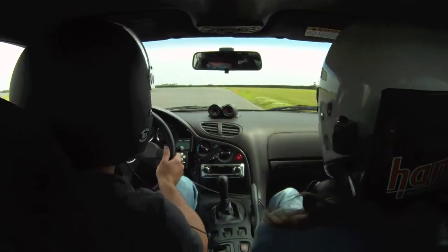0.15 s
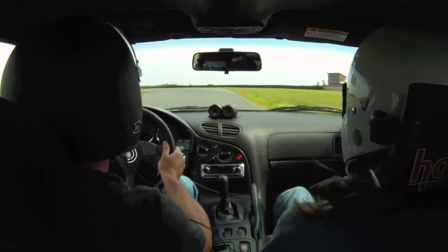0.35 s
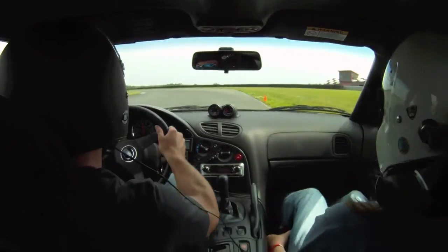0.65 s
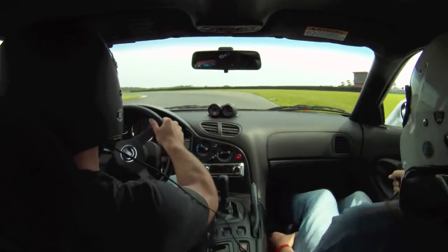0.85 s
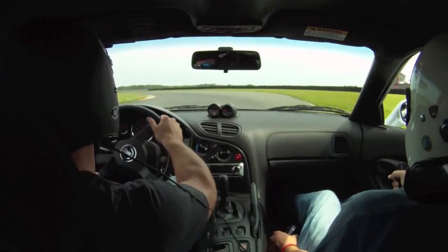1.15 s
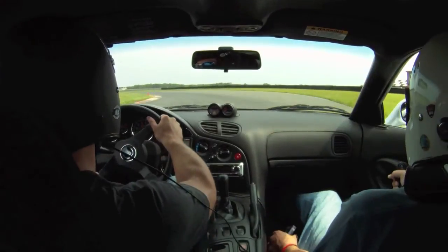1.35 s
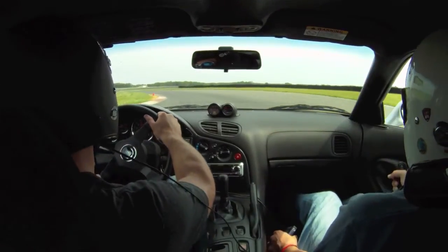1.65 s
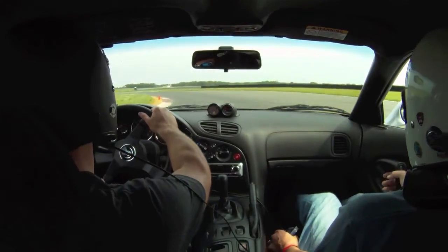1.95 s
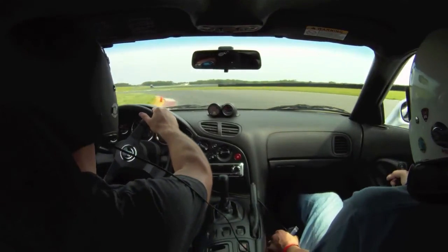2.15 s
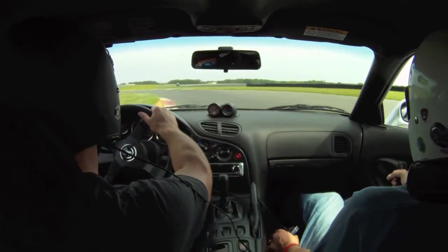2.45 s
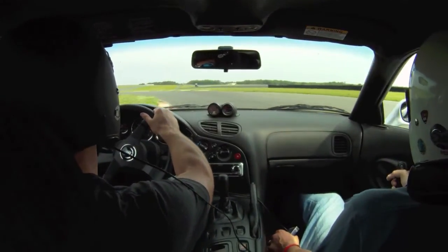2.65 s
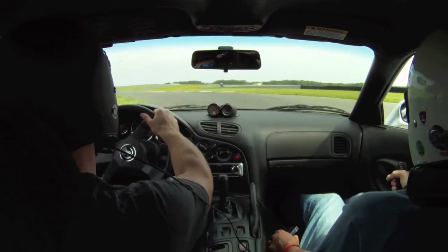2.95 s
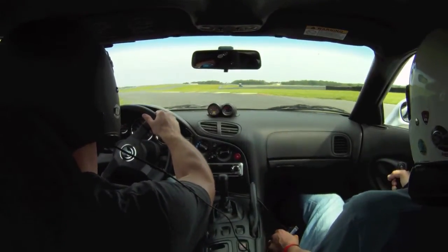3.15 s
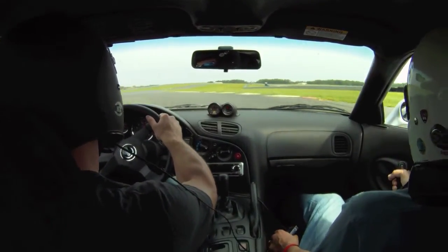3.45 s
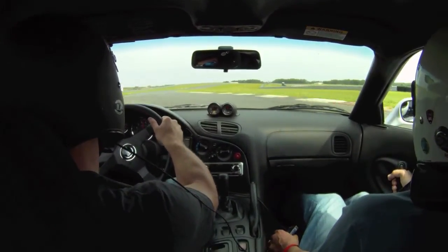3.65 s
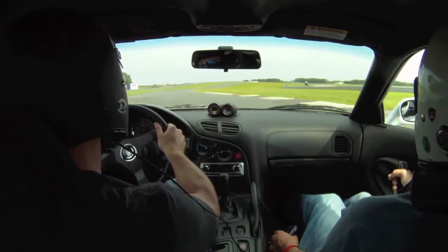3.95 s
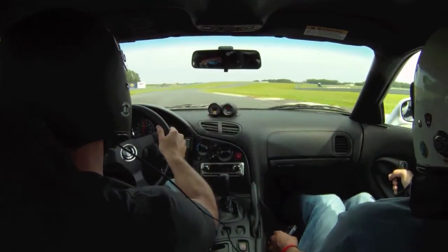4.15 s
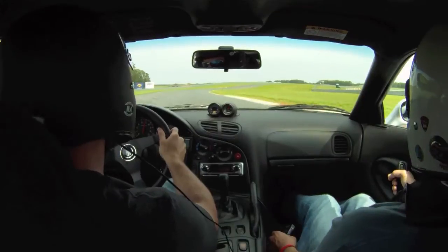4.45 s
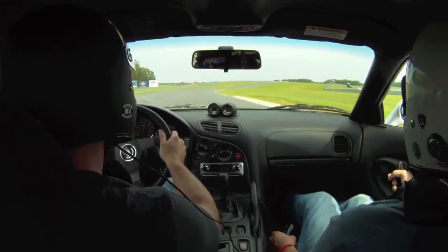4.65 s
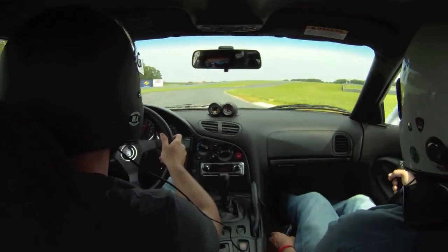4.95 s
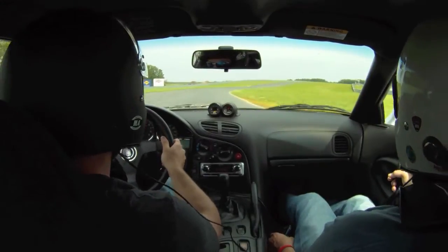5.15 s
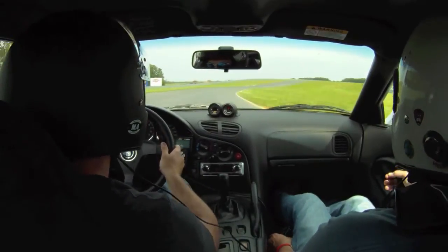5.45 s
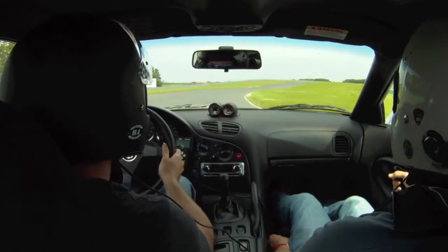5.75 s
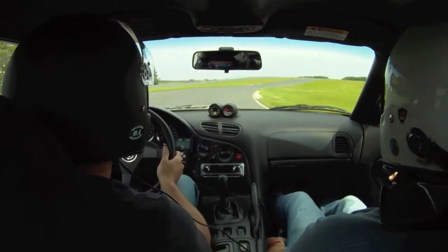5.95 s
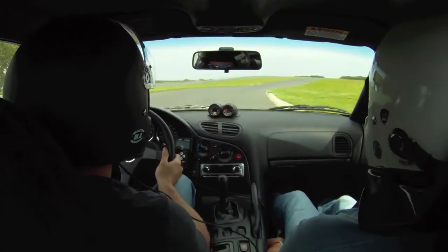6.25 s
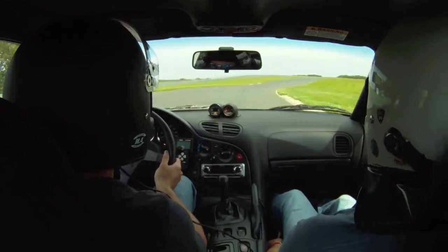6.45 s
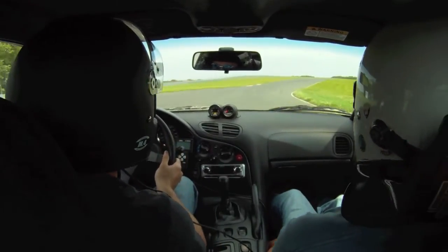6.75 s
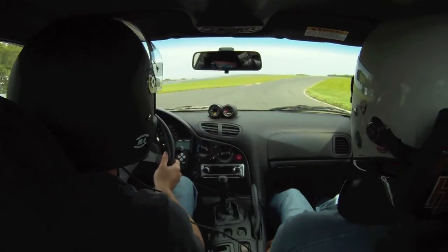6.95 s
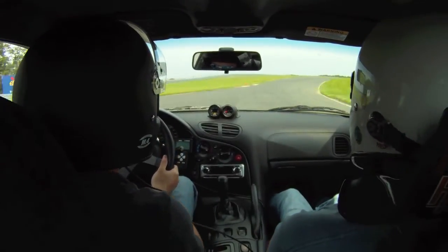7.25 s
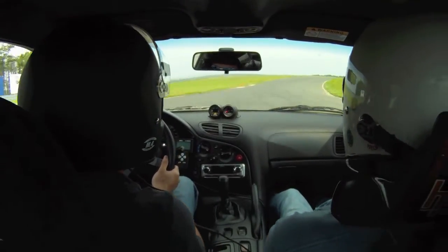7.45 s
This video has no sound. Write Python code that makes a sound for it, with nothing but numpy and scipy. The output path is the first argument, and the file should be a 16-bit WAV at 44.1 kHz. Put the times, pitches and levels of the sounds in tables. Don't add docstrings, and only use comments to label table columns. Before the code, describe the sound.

Inside a sports car at speed, captured by a small, gritty camera microphone with limited treble. From 0 to 1.1 s the engine coasts, a muffled hum sinking slightly over deep body boom, tyre roar and wind, with a cluster of suspension thumps around 0.15-0.6 s. At about 1.15 s the throttle opens with a small driveline jerk, and a full, buzzing growl climbs smoothly until 5.9 s, its overtones swelling through cabin resonances. Loose trim rattles in dry ticks from 2.2 to 3.8 s; a bump lands near 3.0 s. A faint high turbo whistle is clearest around 4-4.6 s. At 5.95 s the throttle shuts: load vanishes and a fluttering, chirping hiss vents for under half a second. Heavy thumps and exhaust pops hit at 6.2, 6.4, 6.55, 6.85 and 7.0 s, briefly ducking the level. The rough hum then sinks over rumbling road noise until 7.6 s.

```python
import sys
import numpy as np
from scipy import signal
from scipy.fft import rfft, irfft, next_fast_len
from scipy.io import wavfile
from scipy.ndimage import uniform_filter1d

SR = 44100
rng = np.random.default_rng(int(sys.argv[2]) if len(sys.argv) > 2 else 0)


def master(y):
    cut = np.clip(np.atleast_2d(y).T, -1, 1)
    pcm = np.round(cut * 32767)
    wavfile.write(sys.argv[1], SR, pcm.astype(np.int16))


def to_linear_factor(level_db):
    exponent = np.asarray(level_db, float) / 20
    return 10 ** exponent


N = 335601


def curve(table, step=1):
    s, *columns = np.transpose(table)
    return [np.interp(np.arange(0, N, step) / SR, s, c) for c in columns]


def unit(x):
    return x / np.sqrt(np.mean(np.abs(x) ** 2))


def modes(hz, table, order=1):
    return sum(to_linear_factor(db) / (1 + 1j * (hz / f - f / hz) * f / width) ** order for f, width, db in table)


def shaped(x, gain_at):
    size = next_fast_len(N)
    hz = np.arange(size // 2 + 1) * SR / size + 1e-3
    return irfft(rfft(x, size) * gain_at(hz), size)[:N]


def noise(gain_at):
    size = next_fast_len(N)
    hz = np.arange(size // 2 + 1) * SR / size + 1e-3
    return irfft(rfft(rng.standard_normal(size)) * gain_at(hz), size)[:N]


def walk(rate_hz, size=1):
    pole = np.exp(-2 * np.pi * rate_hz * 32 / SR)
    steps = rng.standard_normal(N // 32 + 2000)
    steps = signal.lfilter([1], np.poly([pole, pole]), steps)[1998:]
    return unit(np.interp(np.arange(0, N, size) / 32, np.arange(len(steps)), steps))


def coloured(table, flicker_db, flicker_hz, rings=()):
    table_hz, db = np.transpose(table)
    octave = np.log2(table_hz)
    out = 0
    for centre in np.arange(octave[0], octave[-1], .5):
        def band_gain(hz):
            share = np.cos(np.pi * np.clip(np.log2(hz) - centre, -.5, .5))
            return share * to_linear_factor(np.interp(np.log2(hz), octave, db)) * (1 + modes(hz, rings))
        out = out + to_linear_factor(flicker_db * walk(flicker_hz)) * noise(band_gain)
    return unit(out)


def swell(s, attack, hold, release):
    t = np.arange(N) / SR - s
    return np.clip(t / attack, 0, 1) * np.exp(-np.maximum(t - attack - hold, 0) / release)


def pedal():
    down_s, up_s = 1.15, 5.93
    return swell(down_s, .1, up_s - down_s - .1, .04)


def revs():
    # (time [s], firing rate [Hz])
    speed = [(0, 158), (.45, 145), (.8, 138.5), (1.1, 137.3), (1.4, 138), (2.3, 142.3), (2.85, 145.4),
             (3.2, 148.6), (3.5, 151.7), (3.8, 156.2), (4.4, 165.8), (4.7, 172), (5.3, 183.9), (5.6, 190.6),
             (5.91, 196.5), (6.12, 190), (6.9, 183.5), (7.61, 162)]
    # (time [s], swing [Hz], width [s])
    shunts = [
        (1.14, -5, .025),
        (1.2, 7, .04),
        (1.29, -1.7, .05),
        (6.03, -13, .05),
    ]
    t = np.arange(N) / SR
    jerks_hz = sum(hz * np.exp(-((t - s) / width) ** 2) for s, hz, width in shunts)
    return curve(speed)[0] + jerks_hz


def road(turn):
    # (frequency [Hz], width [Hz], level [dB])
    boom_modes = [(33, 9.2, 15.5), (59.4, 20, 1.5), (79, 15, -1), (120, 21, -26)]
    # (frequency [Hz], density [dB per Hz])
    roar_spectrum = [(90, -12), (130, 3.5), (200, -2.5), (300, -1.5), (420, -3), (600, -12.5), (750, -15),
                     (900, -26), (1300, -26)]
    # (frequency [Hz], density [dB per Hz])
    wind_spectrum = [(530, -36), (900, 1), (998, 2.5), (1340, 0.5), (1870, -2), (2910, -1.5), (4130, -13),
                     (5080, -17), (6000, -24.5), (7800, -68.5), (13200, -120)]
    # (frequency [Hz], width [Hz], level [dB])
    dash_rings = [(1486, 40, -13.5), (2343, 140, -5), (3007, 60, -7.5)]
    # (time [s], body shake [dB], rush of air and tyre scrub [dB])
    surface = [(0, 2, 0), (.3, 5, 0), (.62, 2, -.5), (.9, -2, -2.5), (1.2, 0, 1), (1.55, -3, -3.5),
               (1.95, -3, -2), (2.4, 0, .5), (2.9, -4, 1), (3.75, -4, 1.5), (4.1, -8, -2.5),
               (4.4, -6, -1.5), (4.85, -1.5, 1), (5.6, 2, 5), (6.1, 4, 5), (6.62, 7.5, 2), (6.9, 4, 2),
               (7.61, 2.5, 0)]
    shake_db, rush_db = curve(surface)
    boom_db = -24.5 + shake_db
    roar_db = -35.5 + .12 * shake_db + .55 * rush_db + .7 * walk(5)
    wind_db = -49 + rush_db + .6 * walk(6)

    def boom_gain(hz):
        return modes(hz, boom_modes) * hz ** 2 / (hz ** 2 + 23.0 ** 2) / (1 + (hz / 140) ** 4)

    boom = unit(noise(boom_gain))
    boom = unit(np.tanh(.5 * boom))
    roar = to_linear_factor(roar_db + 3.5) * coloured(roar_spectrum, 3.0, 24)
    puffs = 1 + 0.098 * np.cos(turn)
    wind = to_linear_factor(wind_db + 2) * coloured(wind_spectrum, 1.0, 21, dash_rings) * puffs
    return to_linear_factor(boom_db + 2.0) * boom + roar + wind


def rattle():
    # (time [s], length [s], level [dB])
    bursts = [(.16, .004, -55), (.85, .004, -58), (2.175, .022, -53), (2.24, .03, -60), (2.32, .022, -53),
              (2.43, .015, -54), (2.48, .025, -52), (2.61, .03, -50), (2.755, .012, -53), (2.79, .03, -51),
              (2.875, .015, -54), (2.925, .022, -54), (3.05, .018, -56), (3.19, .018, -58),
              (3.335, .018, -57), (3.44, .015, -59), (3.48, .012, -58), (3.67, .02, -60), (3.77, .015, -60)]
    buzz_s, buzz_rise_s, buzz_db = 2.1, 1.2, -61
    t = np.arange(N) / SR
    shake = to_linear_factor(buzz_db) * pedal() * np.clip((t - buzz_s) / buzz_rise_s, 0, 1)
    for s, length, db in bursts:
        near = slice(int((s - 2 * length) * SR), int((s + 2 * length) * SR))
        shake[near] += to_linear_factor(db) * np.exp(-((t[near] - s) / length) ** 4)
    ticks = (rng.random(N) < .15) * to_linear_factor(2 * rng.exponential(size=N)) * rng.standard_normal(N)
    plastic = [(3100, 500, -4), (4100, 500, 0), (4650, 400, -1), (5200, 500, -5)]  # Hz, width Hz, dB
    body = shaped(ticks, lambda hz: modes(hz, plastic) / (1 + (hz / 5600) ** 12))
    return shake * unit(body)


def thumps():
    # (time [s], peak [dB], frequency [Hz], crack level [dB], direction [+1 or -1])
    blows = [(0.152, -12, 90, -56, 1), (0.22, -13, 80, -60, -1), (0.307, -13, 70, -60, -1),
             (0.357, -14, 90, -60, 1), (.464, -10, 80, -60, -1), (.26, -25.5, 260, -56, 1),
             (.55, -24, 376, -51, -1), (.6, -25.5, 253, -54, 1), (1.137, -17, 197, -60, 1),
             (1.198, -20, 324, -57, -1), (3.014, -16, 149, -46, 1), (3.04, -30, 606, -42, 1),
             (6.164, -7, 191, -62, -1), (6.17, -17, 327, -48, 1), (6.2, -7, 69, -42, -1),
             (6.415, -25.5, 613, -50, 1), (6.425, -19.5, 322, -39, 1), (6.441, -6.5, 91, -39, -1),
             (6.536, -15, 240, -49, 1), (6.545, -21.5, 350, -48, 1), (6.573, -17, 50, -37, 1),
             (6.85, -4.5, 88, -42.5, -1), (6.981, -5, 95, -33, 1)]
    out, t = np.zeros(N), np.arange(SR // 5) / SR
    crackle = rng.standard_normal((len(blows), len(t)))
    for (s, db, hz, crack_db, way), hiss in zip(blows, crackle):
        t60_s = .022 - .0014 * db
        swing = np.sin(2 * np.pi * hz * (t + 14 * t ** 2)) * np.exp(-np.log(1000) * t / t60_s)
        crack = uniform_filter1d(np.diff(hiss, prepend=0), size=5) * 3
        crack = crack * np.exp(-np.abs(t - .003) / 0.0005)
        blow = np.sign(way) * to_linear_factor(db) * swing / swing.max() + to_linear_factor(crack_db) * crack
        out[int(s * SR):][:len(t)] += blow
    return out


def turbo():
    # (time [s], level [dB], hold [s], release [s])
    whine = [
        (3.0, -69, .4, .4),
        (3.95, -63, .68, .05),
        (4.72, -71, .3, .6),
    ]
    hz = 4510 + 3.3 * np.maximum(revs() - 168, 0)
    boost = pedal() * sum(to_linear_factor(db) * swell(s, .08, hold, release) for s, db, hold, release in whine)
    phase = 2 * np.pi * np.cumsum(hz + 16 * walk(30)) / SR
    return boost * to_linear_factor(3 * walk(15)) * np.sin(phase)


def valve():
    # (time [s], level [dB], attack [s], hold [s], release [s])
    blow_off = (5.94, -41.5, .05, .17, .16)
    # (frequency [Hz], width [Hz], level [dB])
    bands = [(1990, 50, -3), (2270, 69, 0.5), (2410, 46, -1), (2520, 40, 0.5), (3040, 210, -5),
             (3300, 50, -2), (3860, 64, -7), (2800, 1100, -9)]
    # (time [s], frequency [Hz], length [s], level [dB])
    chirps = [(5.965, 3300, .012, -54), (6.015, 3000, .02, -51), (6.02, 3900, .015, -54),
              (6.04, 2520, .018, -41), (6.065, 2410, .015, -43), (6.105, 2000, .018, -51),
              (6.125, 2270, 0.022, -36.5), (6.13, 3250, .012, -42), (6.165, 2260, .015, -44),
              (6.225, 3300, .015, -53)]
    hiss = sum(to_linear_factor(3.0 * walk(12)) * noise(lambda hz: modes(hz, [band])) for band in bands)
    start, vent_db, *shape = blow_off
    vent = slice(int(start * SR), int((start + .5) * SR))
    t = np.arange(N)[vent] / SR
    out = to_linear_factor(vent_db) * swell(start, *shape) * hiss / np.std(hiss[vent])
    for s, hz, length, db in chirps:
        out[vent] += to_linear_factor(db) * np.exp(-((t - s) / length) ** 2) * np.sin(2 * np.pi * hz * (t - s))
    return out


def engine():
    # (frequency [Hz], width [Hz], level [dB])
    cabin = [(102, 21, -21), (230, 15, -11), (311, 25, -20), (335, 74, -10), (410, 64, -12), (466, 26, -14),
             (564, 9, -10.5), (658, 33, -8), (699, 35, -8), (782, 60, -16), (846, 63, -11), (916, 61, -15),
             (977, 38, -13), (1084, 26, -16), (1200, 58, -11), (1560, 268, -9)]
    # (frequency [Hz], width [Hz], level [dB])
    shaft = [(74, 9, -31)]
    # (multiple of the firing rate [1], level [dB])
    orders_db = [(.5, 1), (1.5, -6), (2, 6), (2.5, -1), (3, 3.5), (3.5, -1), (4, -1), (4.5, 0), (5, -2),
                 (5.5, 2), (6, -2), (6.5, 5), (7, -3), (7.5, 1), (8, -1), (8.5, 0)]
    boost_shift_db = {.5: -3, 1.5: -2, 3: -1.5, 4: 5, 5: -5, 5.5: -4, 6: -2}
    # (time [s], firing tone [dB], load on the overtones [dB])
    effort = [(0, -20, -23), (.45, -21, -21), (.72, -15, -17.5), (1.1, -16.5, -17), (1.19, -19, -10),
              (1.3, -16.5, -4), (1.45, -14.5, -5.5), (2.3, -16, -.5), (3.3, -16.5, -2.5), (4.4, -15.5, -2),
              (5.3, -17.5, 3.5), (5.94, -17.5, 5), (6.03, -22.5, -15), (6.2, -27, -17), (6.42, -22, -19),
              (6.63, -30, -21), (6.78, -23.5, -24), (7.4, -17, -31)]
    # (time [s], roughness [0-1], hold [s], release [s])
    unsettled = [
        (0, .14, .1, .25),
        (1.08, .17, .08, .1),
        (5.94, .33, .65, .3),
    ]
    pulse_fall_db_per_khz, steady_rough = -37, .03
    boost_s, boost_rise_s = 3.55, .25

    hz, (tone_db, load_db) = revs(), curve(effort)
    rough = steady_rough + sum(size * swell(s, .08, hold, release) for s, size, hold, release in unsettled)
    mismatch_db = np.clip(.8 * (hz - 166), -15, 1.5)
    mismatch_db += 10 * swell(6.72, .07, .25, .25)
    turn = 2 * np.pi * np.cumsum(hz) / SR + 1.6 * rough * walk(25)
    out = to_linear_factor(tone_db) * (1 + 1.3 * rough * walk(30)) * np.cos(turn + np.pi / 8)
    out += np.abs(modes(hz / 2, shaft)) * to_linear_factor(3 * walk(6)) * np.cos(turn / 2 + .5 * walk(6))
    boost = pedal() * np.clip((np.arange(N) / SR - boost_s) / boost_rise_s, 0, 1)
    coarse = np.arange(0, N, 64)
    for order, shape_db in orders_db:
        line_hz = order * hz[coarse]
        through = modes(line_hz, cabin, order=2) * to_linear_factor(pulse_fall_db_per_khz * line_hz / 1000)
        drive_db = shape_db + load_db * (order > 1) + mismatch_db * (order % 1 > 0)
        drive_db = drive_db + boost * boost_shift_db.get(order, 0)
        wobble = 1 + (.05 + rough[coarse]) * (walk(15, size=64) + 1j * walk(15, size=64))
        line = np.interp(np.arange(N), coarse, to_linear_factor(drive_db[coarse]) * through * wobble)
        out += np.real(line * np.exp(1j * order * turn))
    return np.sqrt(2) * out, turn


def scene():
    motor, turn = engine()
    return (road(turn) + rattle() + thumps() + turbo() + valve() + motor)[None]


def top_cut(x):
    return signal.sosfilt(signal.butter(12, 15680, fs=SR, output="sos"), x)


def record(dry):
    # (time [s], gain drop [dB])
    ducks = [
        (6.205, -1.5),
        (6.321, -1.5),
        (6.578, -7),
        (6.855, -3),
        (6.986, -3.5),
    ]
    recover_s, squeeze = .1, .25
    t = np.arange(N) / SR
    duck_db = sum(db * (t > s) * np.exp(-np.abs(t - s) / recover_s) for s, db in ducks)
    x = np.tanh(squeeze * dry * to_linear_factor(uniform_filter1d(duck_db, size=100))) / squeeze
    slow = signal.resample_poly(x, 40, 147, axis=1, padtype="reflect")
    held = np.repeat(slow, 4, axis=1)
    held = signal.resample_poly(held, 147, 160, axis=1, padtype="reflect")[:, :N]
    held = signal.sosfilt(signal.ellip(8, .2, 60, 15300, fs=SR, output="sos"), held)
    return top_cut(np.pad(held, ((0, 0), (0, N - held.shape[1])), mode="edge"))


dry = scene()
out = record(dry)
master(out)
```